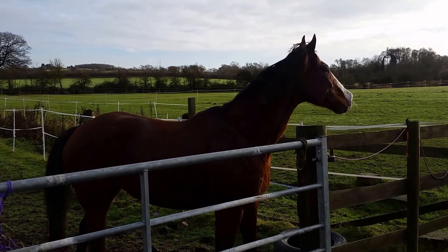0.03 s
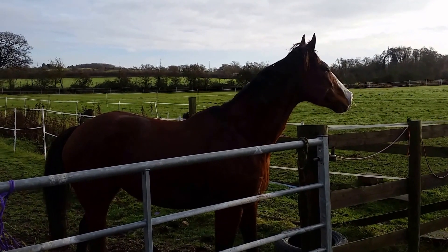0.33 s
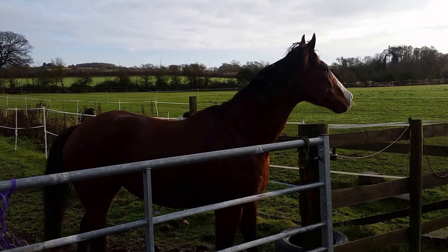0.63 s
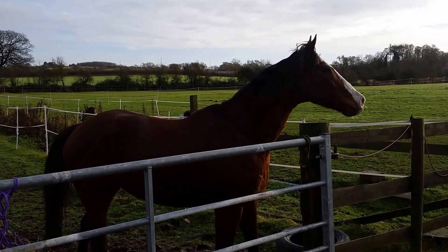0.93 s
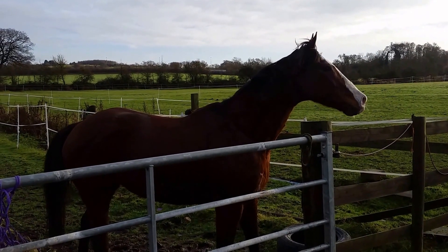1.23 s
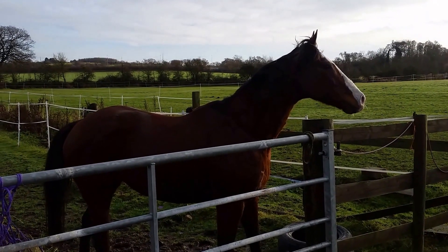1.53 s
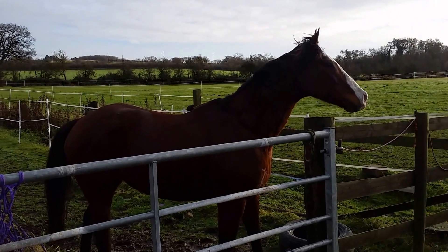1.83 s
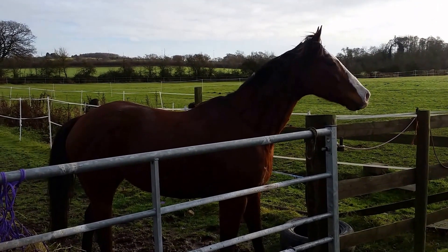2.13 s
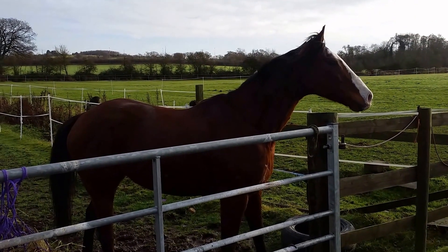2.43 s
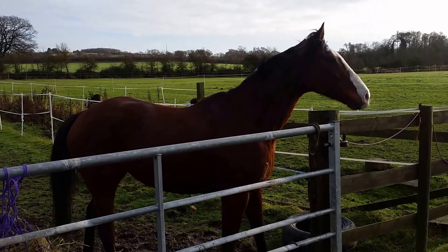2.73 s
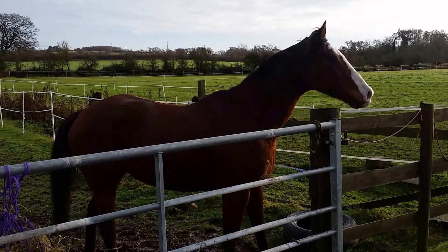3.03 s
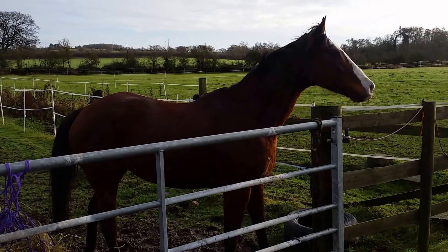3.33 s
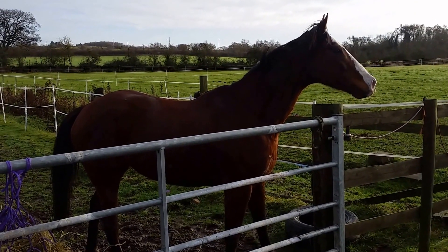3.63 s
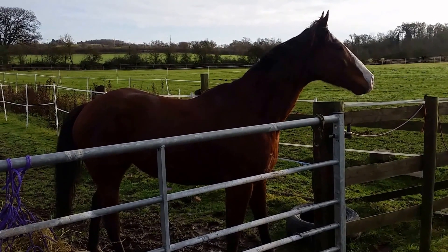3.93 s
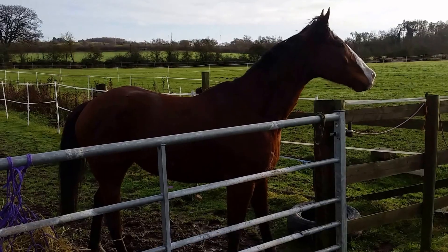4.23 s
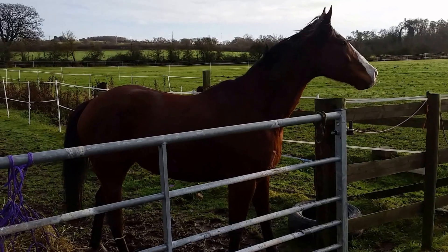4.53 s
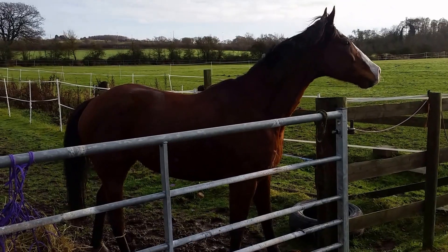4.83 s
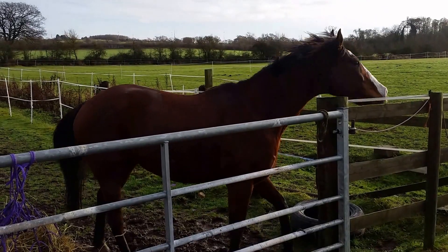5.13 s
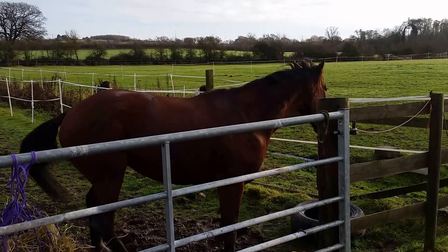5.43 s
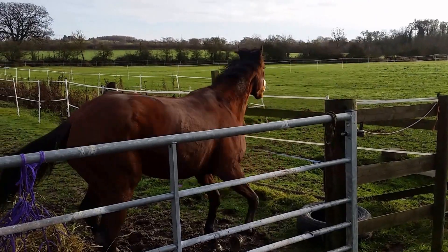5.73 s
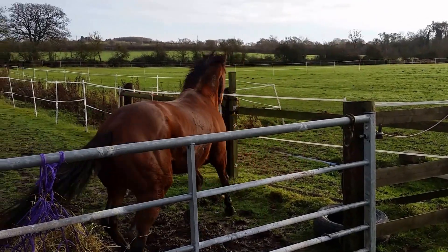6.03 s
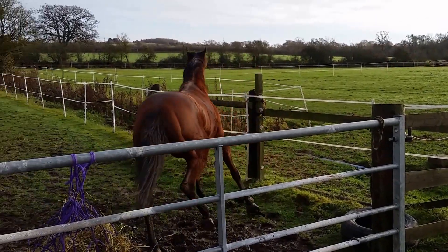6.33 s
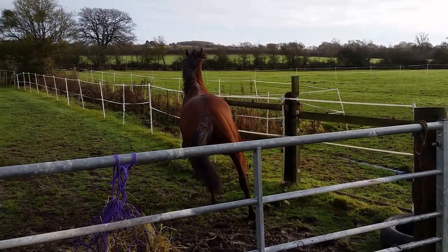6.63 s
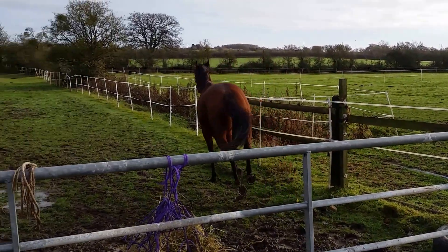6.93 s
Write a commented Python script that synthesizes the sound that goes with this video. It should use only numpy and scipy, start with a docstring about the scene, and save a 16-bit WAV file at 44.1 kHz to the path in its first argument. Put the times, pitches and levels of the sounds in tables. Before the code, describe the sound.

A horse close to the microphone gives a single loud whinny outdoors, shrill at first, then rough, then lower and shuddering as it runs out of air. The call comes late, after a quiet spell of faint rustles, small ticks and soft hisses over a distant rumble. Uneven wind bumps against the microphone before and during the call, which has almost no echo.

```python
"""A gate in a quiet, windy field: a horse gives one long whinny and turns away as the microphone pans.
The call has two voices in one airstream, low vocal folds and a high whistle. It starts as a tense
squeal, turns hoarse and ends in throaty shakes. Gusts buffet the two ports of the microphone, mostly
the right one. Dry rustles, ticks and soft breathy hisses lie close by, over a distant rumble."""
import sys
import numpy as np
from scipy import signal
from scipy.fft import rfft, irfft, next_fast_len
from scipy.io import wavfile
from scipy.ndimage import uniform_filter1d, map_coordinates

SR = 44100
rng = np.random.default_rng(int(sys.argv[2]) if len(sys.argv) > 2 else 0)


def store_pcm(level_fs):
    """Save levels as 16-bit WAV."""
    pcm = np.round(np.clip(level_fs, -1, 1) * 32767).astype(np.int16)
    wavfile.write(sys.argv[1], SR, np.atleast_2d(pcm).T)


N = 317079
TIME = np.arange(N) / SR

# the call starts, loses its tension, turns hoarse, opens into a throaty voice, then runs out of air
CALL_S, SLACK_S, HOARSE_S, THROATY_S, SPENT_S = 4.975, 5.22, 5.5, 6.29, 6.88
CHANGE_S = .076  # how gradually one register gives way to the next
SQUEAL_SPENT_DB_PER_S = 8  # out of air, squeal and octave fail sooner than the chest tone


# extra resonances of the tense throat in the opening squeal: (frequency [Hz], gain [dB])
TENSE_THROAT = [(2000, 5), (2430, -12), (2740, 6), (3000, 0), (3520, 8.5), (3800, -7)]
def whinny():
    """The horse at the gate: one airstream drives a low chest tone and a high, whistling squeal."""
    fold_hz, whistle_hz, chest_db, squeal_db = effort()
    rough, whistle_share, octave_db, bright_db = register()
    tense = 1 - glide(SLACK_S, CHANGE_S)
    # tension keeps the whistle pure, while the folds flap unevenly from the start
    whistle_rough = rough * (1 - .5 * tense)
    fold_phase = oscillator(fold_hz, rough * (1 + tense), waver=.013, jitter=.05, jitter_rate=300)
    whistle_phase = oscillator(whistle_hz, whistle_rough, waver=.022, jitter=.05, jitter_rate=380)
    # every other pulse is weaker, less so once the voice turns throaty
    doubling = .45 - .25 * glide(THROATY_S, CHANGE_S)
    alternate = 1 + doubling * np.cos(fold_phase / 2)
    chest = chest_tone(fold_phase, rough, tense, octave_db, doubling)
    hoarse = hoarse_overtones(fold_phase, fold_hz, rough, alternate)
    high = whistle(whistle_phase, whistle_hz, whistle_rough, fold_phase, fold_hz, rough, alternate)
    squeal = blend(hoarse, high, whistle_share)
    squeal = (1 - tense) * squeal + tense * shaped(squeal, TENSE_THROAT)
    # the treble is beamed forward and fades as the head turns from the microphone
    treble = filtered(squeal, lambda hz: 1 - 1 / (1 + (hz / 2400) ** 12))
    squeal = squeal + (amp(bright_db) - 1) * treble
    return (amp(chest_db) * chest + amp(squeal_db) * squeal) * (TIME > CALL_S)


# melody of the vocal folds, before shakes and the final sinking: (time [s], pitch [Hz])
FOLD_PITCH = [(4.99, 478.4), (5.06, 568), (5.14, 608), (5.22, 545), (5.36, 514.7), (5.42, 450),
              (5.62, 458.2), (5.82, 492.5), (6.2, 493.8), (6.69, 505.2), (6.82, 486.5)]
# melody of the whistle, likewise, scooping upward: (time [s], pitch [Hz])
WHISTLE_PITCH = [(4.98, 1285), (5.04, 1627), (5.155, 1898), (5.37, 2038), (5.75, 1991), (6.22, 2140),
                 (6.7, 2583)]
# shakes of the throat: (time [s], fold pitch lost [share], squeal choked [dB], chest choked [dB])
THROAT_SHAKES = [(5.429, 0.016, 2.5, -2.5), (5.716, 0.049, 2.5, -0.5), (6.021, 0.061, 1.5, 2.5),
                 (6.121, 0.036, 5.5, 3), (6.275, .06, 3.5, -1.5), (6.372, 0.18, 12.5, -3),
                 (6.503, .25, 9.5, -2.5), (6.631, 0.25, 7, -1.5), (6.757, .21, 4.5, -4),
                 (6.885, 0.19, 4.5, 4), (7.008, 0.23, 7.5, 7), (7.142, .14, 8.5, 7)]
def effort():
    """Pitch and level of both voices: a quick attack, a long hold broken by shakes, a sinking end."""
    age, spent = since(CALL_S), since(SPENT_S)
    # each shake slackens the throat: the pitches sag and the squeal is choked
    shake = lambda s: 1 / (1 + ((TIME - s) / .04) ** 2) ** 2
    sag, squeal_choke_db, chest_choke_db = sum(np.outer(depths, shake(s)) for s, *depths in THROAT_SHAKES)
    sink = 1 - .8 * spent
    fold_hz = curves(FOLD_PITCH)[0] * (1 - sag) * sink
    whistle_hz = curves(WHISTLE_PITCH)[0] * (1 - .8 * sag) * sink
    breath_db = -26 * np.maximum(1 - age / .026, 0) - 21 * spent
    push_db = 10.5 * np.exp(-age / .032)  # the call starts with a push in the chest
    late_db = 16 * np.exp(-age / .091)  # the squeal speaks a little later
    chest_db = -25.5 + 3 * age + push_db - chest_choke_db
    squeal_db = -17.5 - late_db - SQUEAL_SPENT_DB_PER_S * spent - squeal_choke_db
    return fold_hz, whistle_hz, breath_db + chest_db, breath_db + squeal_db


# registers: (roughness [0-1], whistle in the squeal [share], octave of the folds [dB], treble [dB])
CLEAR, HOARSE, THROATY = (.4, .75, -8, 6.5), (.83, .9, -10, 0), (.49, .1354, -1, -9)
def register():
    """The voice passes from clear to hoarse to throaty, and frays as the air runs out."""
    hoarse, throaty = glide(HOARSE_S, CHANGE_S), glide(THROATY_S, CHANGE_S)
    rough, whistle_share, octave_db, bright_db = (
        a + (b - a) * hoarse + (c - b) * throaty for a, b, c in zip(CLEAR, HOARSE, THROATY))
    spent = since(SPENT_S)
    return rough + .61 * spent, whistle_share, octave_db - SQUEAL_SPENT_DB_PER_S * spent, bright_db


# low resonances of the throat: (frequency [Hz], level [dB])
CHEST_SPECTRUM = [(200, -65), (280, 2), (360, 1.5), (470, -1), (600, -3.5), (720, -8), (930, 5.5),
                  (1080, -0.5), (1300, -20), (1800, -39)]
def chest_tone(phase, rough, tense, octave_db, doubling):
    """The folds sound their pitch, its octave and, while tense, the octave below, mixed with rasp."""
    fundamental = flutter(rough) * np.sin(phase)
    octave = flutter(rough) * amp(octave_db) * np.sin(2 * phase)
    undertone = .5 * doubling * tense * np.sin(phase / 2)
    tone = unit(fundamental + octave + undertone) * amp(4 * rough * (1 + tense) * wobble(140))
    return blend(tone, coloured(rasp(phase), CHEST_SPECTRUM), .46 * rough)


# resonances of the mouth: (frequency [Hz], gain [dB])
MOUTH_RESONANCES = [(900, -61), (1250, -10), (1520, -4), (1720, -5), (2020, -4), (2300, -12.5),
                    (2550, -3.5), (2900, -11), (3400, -17), (3750, -24), (4200, -22), (5500, -40.5),
                    (10000, -34.5), (16000, -36)]
def hoarse_overtones(phase, fold_hz, rough, alternate):
    """Upper harmonics of the folds and rasping breath ring through the mouth."""
    overtones = 0
    for k in range(3, 12):
        gain = flutter(rough) * amp(along(MOUTH_RESONANCES, k * fold_hz))
        overtones += gain * np.sin(k * phase + rng.uniform(0, 2 * np.pi))
    return blend(unit(overtones * alternate), coloured(rasp(phase), MOUTH_RESONANCES), .65 * rough)


# tones beside the whistle, ahead of the mouth: (offset [fold pitches], relative level [dB])
WHISTLE_SIDEBANDS = [(-1, -8), (1, -6), (2, -9), (3, -12)]
def whistle(phase, hz, whistle_rough, fold_phase, fold_hz, rough, alternate):
    """The high voice: pulses of the folds give it sidebands, which the mouth's resonances colour."""
    sidebands = 0
    for k, db in WHISTLE_SIDEBANDS:
        gain = flutter(rough) * amp(db + along(MOUTH_RESONANCES, hz + k * fold_hz))
        sidebands += gain * np.sin(phase + k * fold_phase)
    carrier = np.sqrt(flutter(rough)) * np.sin(phase)
    partials = carrier + (.5 + rough) * sidebands + amp(-26) * np.sin(2 * phase)
    tone = partials * alternate * amp(1.9 * whistle_rough * (wobble(150) + wobble(30)))
    mean_power = np.abs(uniform_filter1d(tone ** 2, size=SR // 12))
    return tone / np.sqrt(mean_power)  # the airstream holds its mean power steady


def oscillator(hz, rough, waver, jitter, jitter_rate):
    """Phase of a vibrating tissue: with roughness it wavers more and its cycles grow uneven."""
    drift = waver * wobble(42) + jitter * wobble(jitter_rate)
    return 2 * np.pi * np.cumsum(hz * (1 + rough * drift)) / SR


def flutter(rough):
    """Gain of one partial, which flares and fades on its own as the throat and lips flutter."""
    return amp((1 + 3.5 * rough) * wobble(50))


def rasp(fold_phase):
    """Breath noise pulsed by the folds."""
    return rng.standard_normal(N) * (1 + 1.4 * np.cos(fold_phase))


# colour of the call's scatter around the gate: (frequency [Hz], gain [dB])
SCATTER_COLOUR = [(500, -8), (900, -14), (1500, -3), (4000, .5)]
def at_microphone(voice):
    """The call reaches the two ports at different times; ground, gate and fence scatter a short tail."""
    panned = glide(5.69, .57)  # the call drifts from the right toward the centre as the microphone pans
    left_lag_s = (.2 * (1 - panned) - .029 * panned) / 1000
    balance_db = -5 + 2 * panned  # left minus right
    delayed = lambda lag_s: map_coordinates(voice, [(TIME - lag_s) * SR])
    direct = np.array([amp(side * balance_db / 2) * delayed(side * left_lag_s / 2) for side in (1, -1)])
    t60_s, renew_s = .025, .1601  # the moving head keeps changing the paths, so the tails crossfade
    t = TIME[:SR // 6]
    scatter = np.zeros((2, N))
    for k, noise in enumerate(rng.standard_normal((18, 2, len(t)))):
        tail = noise * amp(-60 * t / t60_s) * (t > .002)
        fade = np.sqrt(np.maximum(1 - np.abs((TIME - CALL_S) / renew_s - k), 0))
        scatter += signal.oaconvolve(direct * fade, tail / np.linalg.norm(tail[0]), axes=1)[:, :N]
    return amp(-2.5) * direct + shaped(scatter, SCATTER_COLOUR)


# flow at the microphone between gusts: (time [s], left level [dB], right level [dB])
BASE_FLOW = [(2.25, -52, -42), (2.75, -38, -28.5), (3.1, -28, -24.5), (3.8, -30.5, -30),
             (4.2, -39.5, -19.5), (4.5, -32.5, -34), (4.62, -31.5, -25), (5.25, -35.5, -18.5),
             (7.19, -26, -23)]
# gusts on one port: (time [s], half length [s], level [dB], port [0 left, 1 right])
PORT_GUSTS = [(2.37, 0.037, -33.5, 1), (2.993, 0.029, -18, 0), (3.124, 0.04, -20.5, 1),
              (3.292, 0.043, -21, 1), (3.719, 0.16, -22.5, 1), (4.1, 0.049, -22, 1),
              (4.169, 0.051, -22.5, 0), (4.37, 0.077, -21, 1), (4.975, 0.028, -17.5, 1),
              (5.739, 0.063, -17, 1), (6.49, 0.034, -16.5, 1)]
# turbulence in a port: (frequency [Hz], level [dB])
BUFFET_SPECTRUM = [(20, -11), (55, 2.5), (125, 4.5), (200, -4), (300, -13), (450, -27.5), (800, -47.5),
                   (2000, -92.5)]
# eddies that thump the right port: (time [s], relative level [dB], width [ms])
EDDY_THUMPS = [(2.401, -18.5, 3.7), (2.834, -12.5, 3.05), (3.125, -6.5, 2.6), (3.147, -7, 2.8),
               (3.158, -14.5, 1.46), (3.278, -11, 2.84), (3.295, -17.5, 2.4), (3.884, -10.5, 2.73),
               (4.059, -15.5, 0.87), (4.096, -9.5, 1.54), (4.261, -5.5, 3), (4.328, -12.5, 2.55),
               (4.598, -15, 0.81), (4.63, -8, 1.72), (4.706, -8, 1.93), (4.786, -15.5, 3.2),
               (4.902, -13.5, 1.27), (5.124, -10.5, 1.85), (5.793, -10.5, 0.67), (6.115, -2.5, 1.16)]
def wind_buffeting():
    """Wind on the microphone shakes each port on its own; the hardest eddies land as dull thumps."""
    flow = amp(curves(BASE_FLOW))
    for s, half, db, port in PORT_GUSTS:
        side = int(port > .5)
        flow[side] = np.hypot(flow[side], amp(db) * swell(s, half))
    lumps = amp([2.6 * wobble(25) + 3.1 * wobble(90) for port in (0, 1)])
    churn = unit(lumps * coloured(rng.standard_normal((2, N)), BUFFET_SPECTRUM))
    large_eddies = lowpass(churn, 174)
    small_eddies = (churn - large_eddies) * flow / amp(-25)  # these gain on the rest as the flow rises
    wind = flow * (large_eddies + small_eddies)
    for s, db, width_ms in EDDY_THUMPS:
        # a passing eddy pushes, flips sharply and pulls
        u = (TIME - s - .001) / (width_ms / 1000)
        push = np.tanh(2.5 * u) * (1 - u * u / 2.5) * np.exp(-u * u / 3)
        wind[1] -= amp(db + 6) * push
    # the flow in a port saturates, which splashes the strongest lumps upward in pitch
    max_swing = .58
    return lowpass(max_swing * np.tanh(wind / max_swing), 900)


# faint rustles close by: (time [s], half length [s], relative level [dB])
NEAR_RUSTLES = [(0.105, 0.11, -68), (0.38, 0.042, -55.5), (0.642, 0.14, -68.5), (1.612, 0.13, -65),
                (2.616, 0.28, -70.5)]
# dry ticks and scuffs: (time [s], relative level [dB], decay by 60 dB [s])
DRY_TICKS = [(0.546, -36, 0.027), (0.6, -27.5, 0.023), (0.856, -34.5, 0.034), (1.154, -30, 0.054),
             (1.882, -46.5, 0.091), (2.63, -42.5, .04), (2.701, -38.5, 0.065), (5.581, -24.5, 0.46),
             (5.782, -16, 0.036), (5.954, -22.5, 0.04), (6.556, -15, 0.092), (6.734, -24.5, 0.065),
             (6.821, -19.5, 0.018), (6.973, -26, 0.12)]
# thin crackle before the call: (frequency [Hz], level [dB])
THIN_SPECTRUM = [(2500, -35), (4500, -7), (6500, 0.5), (8500, -10.5), (10000, 6.5), (13000, -1.5),
                 (16000, -5)]
# fuller crackle during the call: (frequency [Hz], level [dB])
FULL_SPECTRUM = [(2500, -17), (4500, 0), (6500, -1), (8500, -6.5), (10000, -1), (13000, -6.5), (16000, -12)]
def rustles():
    """Dry crackle and ticks near the right port; a high crackling hiss swells with the call and fades."""
    calm_s, hiss_onset_s, hiss_peak_s = 2.65, 5.06, 5.7
    snaps_per_s, snap_decay_s = 9, .002
    grain = unit(amp(1.2 * wobble(500) + 1.2 * wobble(37)))
    clumps = unit(amp(1.4 * wobble(20)))
    snaps = rng.random(N) * (rng.random(N) < snaps_per_s / SR)
    straws = signal.lfilter([1], [1, -np.exp(-1 / (snap_decay_s * SR))], snaps)
    crackle = amp(-70 - 6.5 * since(calm_s)) + swells(NEAR_RUSTLES)
    hiss_db = -36.5 - 11 * np.maximum(hiss_peak_s - TIME, 0) - 5.5 * since(hiss_peak_s)
    hiss_on = glide(hiss_onset_s, .043)
    level = (crackle * (1 + amp(11.5) * straws) + amp(hiss_db) * hiss_on * clumps) * grain
    for s, db, t60 in DRY_TICKS:
        age = since(s)
        click, scuff = amp(-60 * age / .0035), .94 * amp(-60 * age / t60)
        level += amp(db - 10.5) * (click + scuff) * (age > 0)
    thin = coloured(rng.standard_normal((2, N)), THIN_SPECTRUM)
    full = coloured(rng.standard_normal((2, N)), FULL_SPECTRUM)
    return level * blend(thin, full, hiss_on) * amp([[-5.5], [2.5]])


# soft breathy hisses: (time [s], half length [s], relative level [dB])
HISS_SWELLS = [(.5, 0.76, -60.5), (1.527, 0.17, -53.5), (2.754, 0.2, -45.5), (3.102, 0.085, -50),
               (3.974, 0.21, -51)]
# colour of the hiss: (frequency [Hz], level [dB])
HISS_SPECTRUM = [(150, -13), (600, 17), (2000, 0.5), (4500, -16), (8500, -24), (11500, -2.5), (16000, -3.5)]
def hisses():
    """Soft, high, breathy hisses close by on the right, over a thin steady hiss."""
    breathy = coloured(rng.standard_normal((2, N)), HISS_SPECTRUM)
    treble = lambda hz: amp(along(HISS_SPECTRUM, hz)) * (hz > 4000)
    steady = unit(filtered(rng.standard_normal((2, N)), treble))
    return (swells(HISS_SWELLS) * breathy + amp(-73) * steady) * amp([[-3], [2]])


# the open field, far off: (frequency [Hz], level [dB])
FIELD_SPECTRUM = [(20, -24.5), (48, -4.5), (75, -4), (88, 0.5), (110, -7.5), (200, -16), (320, -16.5),
                  (450, -26.5), (750, -21), (1900, -28), (2600, -39.5), (3250, -28.5), (4300, -48),
                  (8000, -79.5)]
# how alike the two ports hear it: (frequency [Hz], correlation [-1 to 1])
PORT_LIKENESS = [(100, 1), (300, 0.87), (700, 0.46), (1400, -0.4), (3000, 0.053)]
def open_field():
    """Distant rumble, alike at both ports, under the wide hush of a breeze."""
    spread = lambda hz: np.arccos(np.clip(along(PORT_LIKENESS, hz), -1, 1)) / 2
    mid_side_gains = lambda hz: np.array([np.cos(spread(hz)), np.sin(spread(hz))])
    mid, side = filtered(rng.standard_normal((2, N)), mid_side_gains)
    return amp(-44) * coloured(np.array([mid + side, mid - side]), FIELD_SPECTRUM)


def amp(db):
    """Decibels to gain."""
    return 10 ** (np.asarray(db) / 20)


def unit(x):
    """x at rms 1."""
    return x / np.sqrt(np.mean(x ** 2) + 1e-20)


def along(points, hz):
    """(Hz, value) points read on a log axis."""
    knots_hz, values = np.transpose(points)
    return np.interp(np.log(hz + 1), np.log(knots_hz + 1), values)


def curves(rows):
    """One value per sample for each column after the time."""
    s, *columns = np.transpose(rows)
    return [np.interp(TIME, s, column) for column in columns]


def wobble(rate):
    """A smooth random curve, rate knots a second."""
    return map_coordinates(rng.standard_normal(int(N * rate / SR) + 4), [TIME * rate])


def filtered(x, response):
    """x times a response of frequency."""
    size = next_fast_len(N + SR // 2)
    return irfft(rfft(x, size) * response(np.fft.rfftfreq(size, 1 / SR)), size)[..., :N]


def lowpass(x, corner_hz):
    """x falling 24 dB an octave above the corner."""
    return filtered(x, lambda hz: 1 / (1 + (hz / corner_hz) ** 4))


def shaped(x, spectrum):
    """x through a (Hz, dB) curve."""
    return filtered(x, lambda hz: amp(along(spectrum, hz)))


def coloured(x, spectrum):
    """x through a (Hz, dB) curve, at rms 1."""
    return unit(shaped(x, spectrum))


def blend(a, b, share):
    """Power mix with the given share of b."""
    share = np.clip(share, 0, 1)
    return np.sqrt(1 - share) * a + np.sqrt(share) * b


def since(s):
    """Seconds gone by after the moment s, zero before it."""
    return np.maximum(TIME - s, 0)


def glide(s, length):
    """A smooth step from 0 to 1 around the moment s."""
    return .5 + .5 * np.tanh((TIME - s) / length)


def swell(s, half):
    """A flat-topped swell around the moment s."""
    return np.exp(-((TIME - s) / half) ** 4)


def swells(rows):
    """Summed gain of (time, half length, dB) swells."""
    return sum(amp(db) * swell(s, half) for s, half, db in rows)


def scene():
    """The horse in its windy field, heard from the microphone."""
    return at_microphone(whinny()) + wind_buffeting() + open_field() + rustles() + hisses()


def record(dry):
    """The recorder rounds off the highest peaks and keeps nothing above its band limit."""
    ceiling, top_hz = .92, 15950
    rounded = dry / (1 + (dry / ceiling) ** 8) ** (1 / 8)
    return filtered(rounded, lambda hz: hz < top_hz)


dry = scene()
out = record(dry)
store_pcm(out)
```